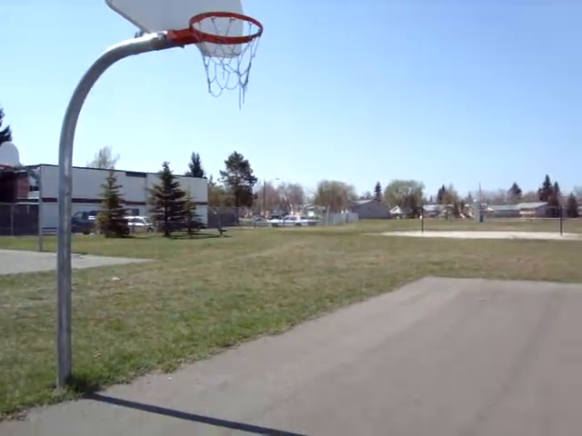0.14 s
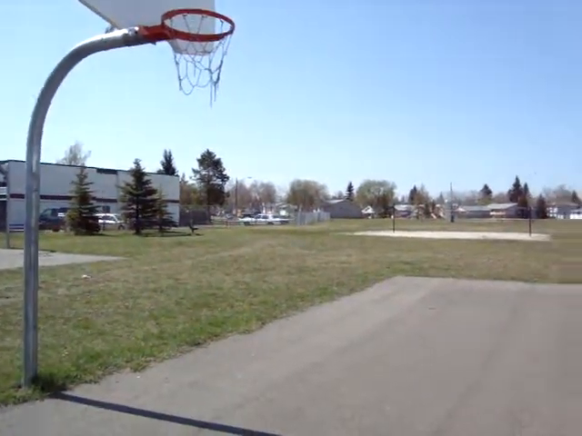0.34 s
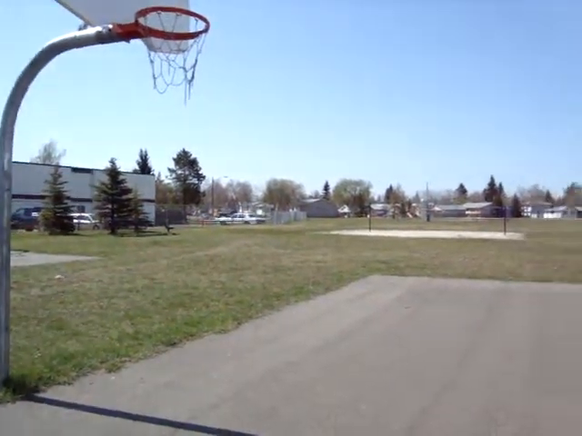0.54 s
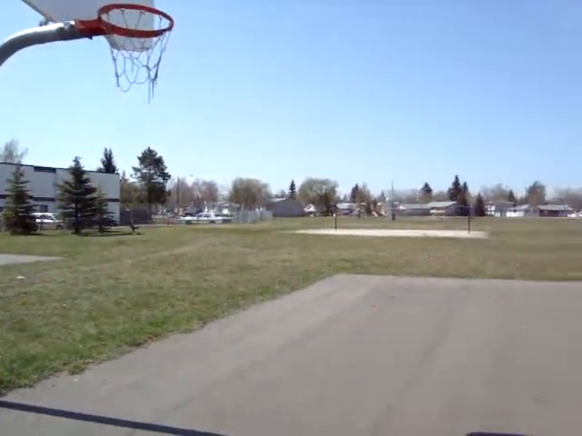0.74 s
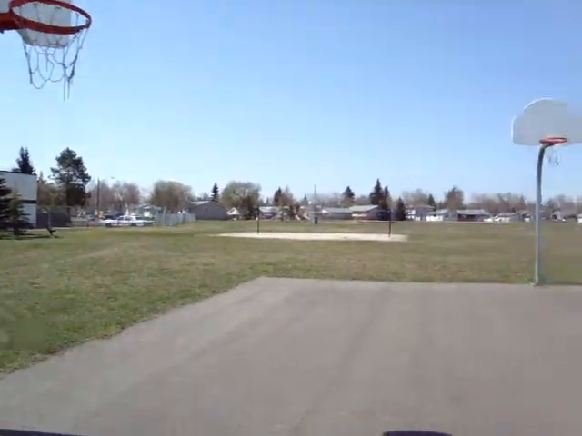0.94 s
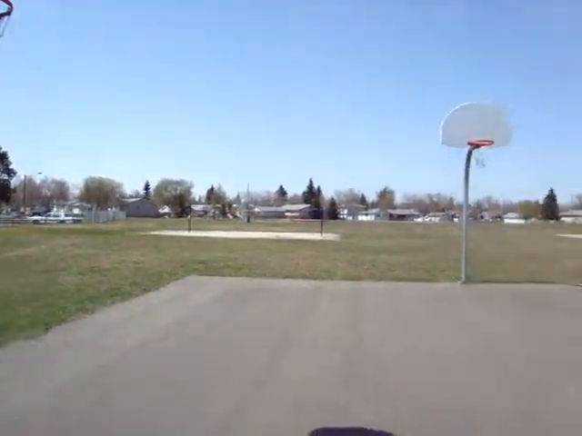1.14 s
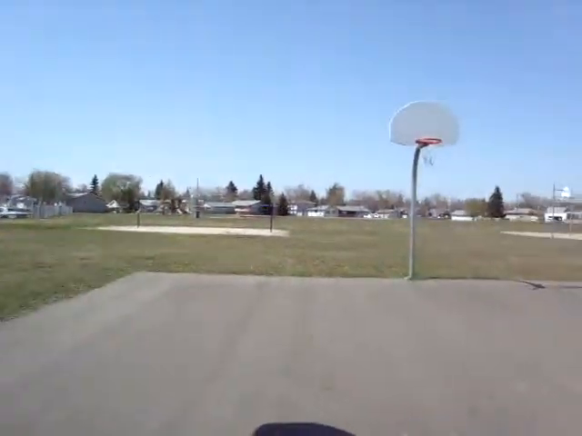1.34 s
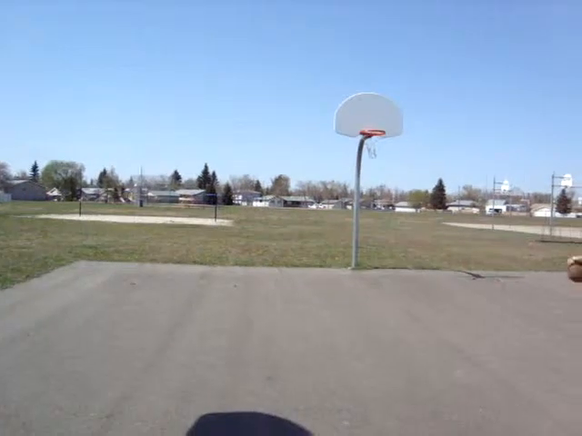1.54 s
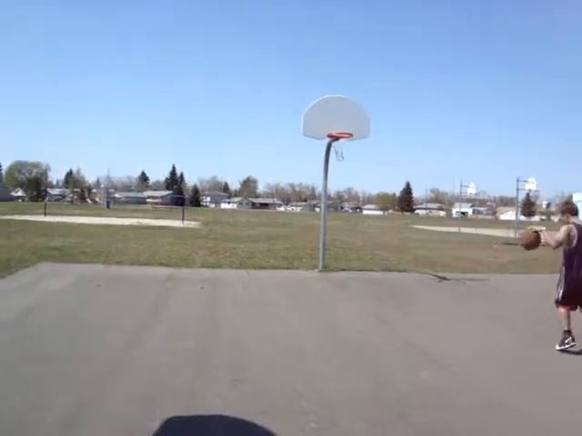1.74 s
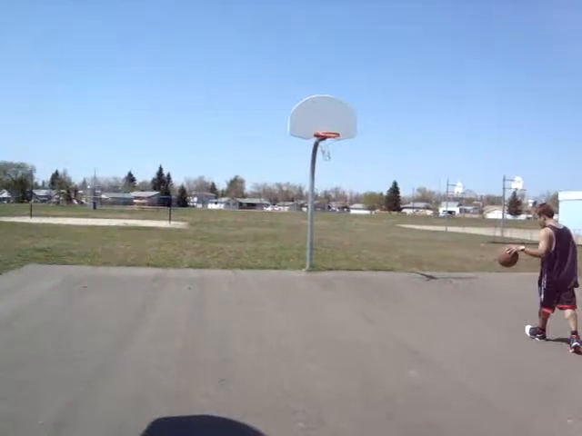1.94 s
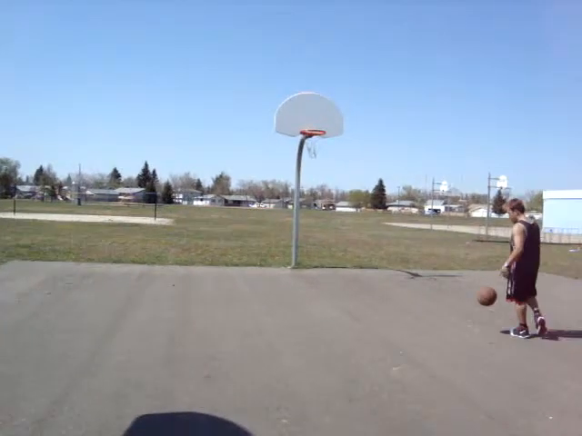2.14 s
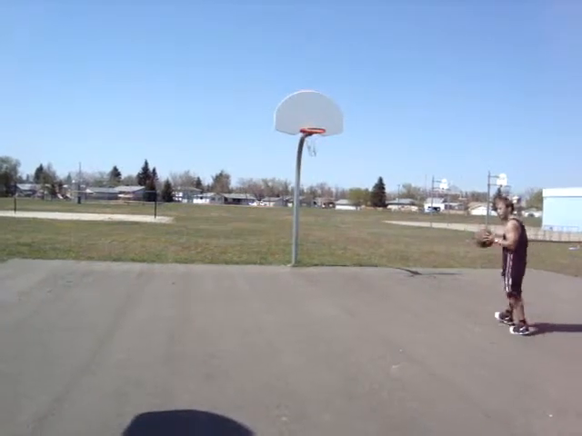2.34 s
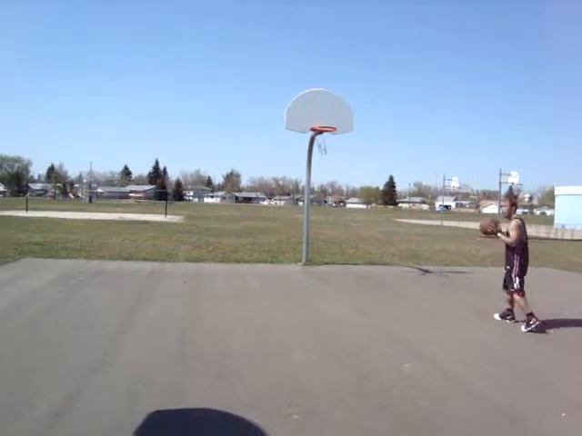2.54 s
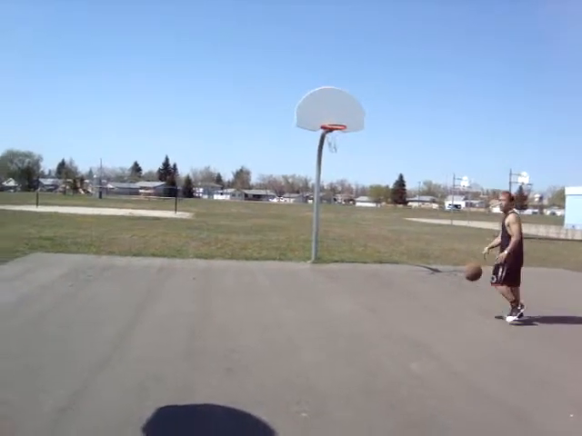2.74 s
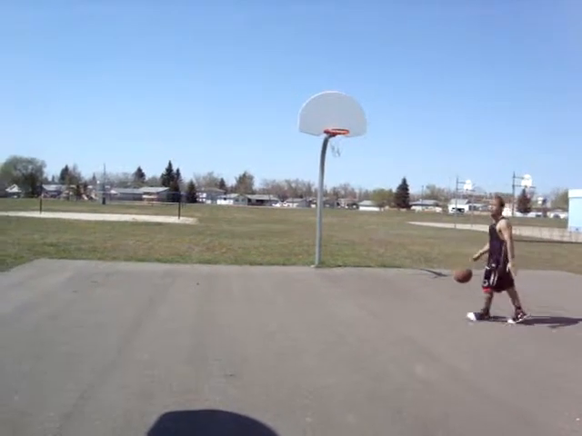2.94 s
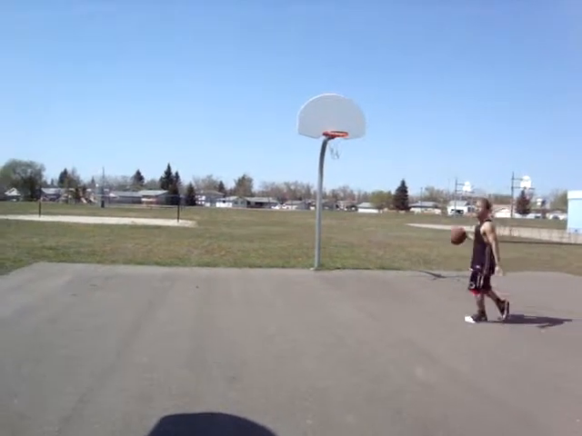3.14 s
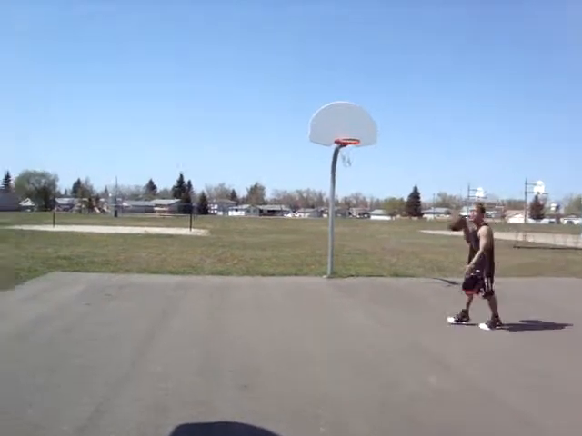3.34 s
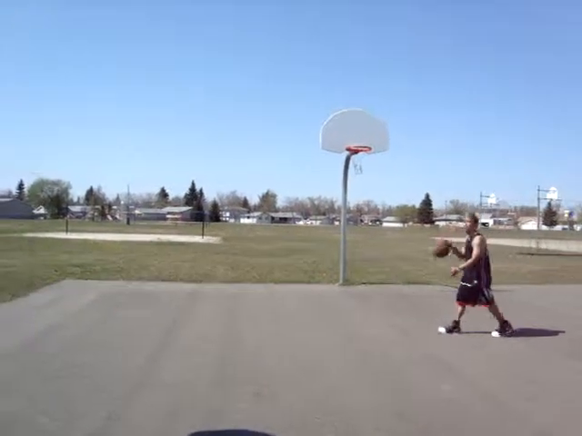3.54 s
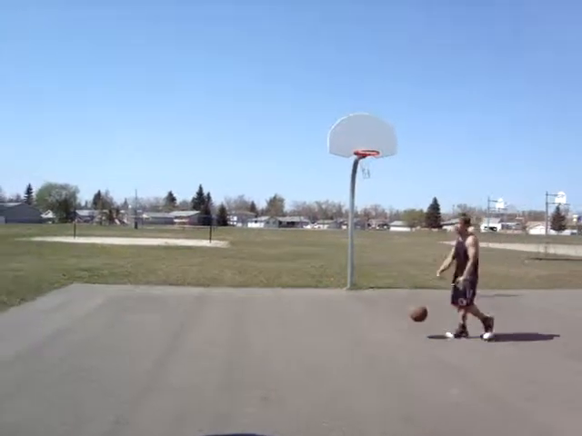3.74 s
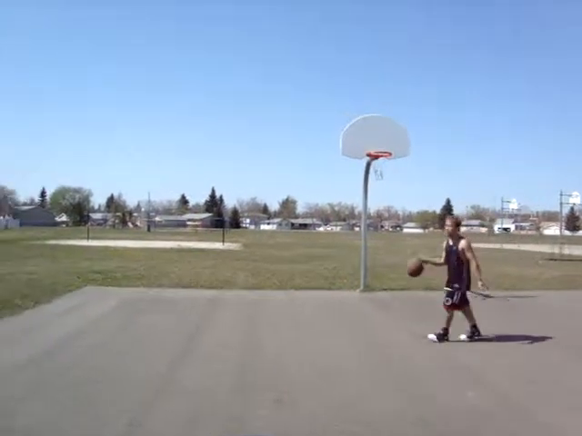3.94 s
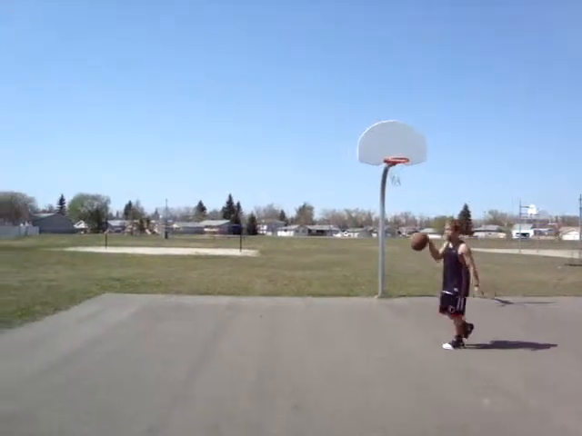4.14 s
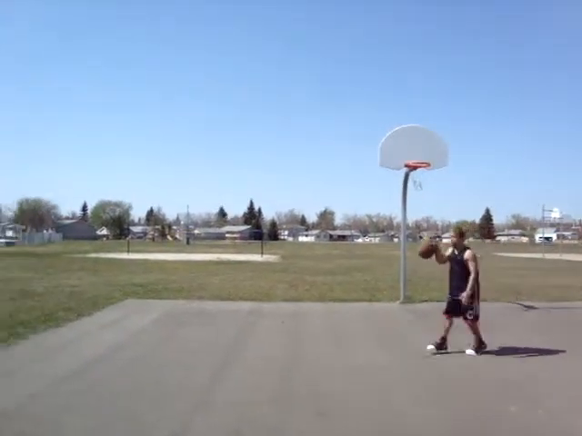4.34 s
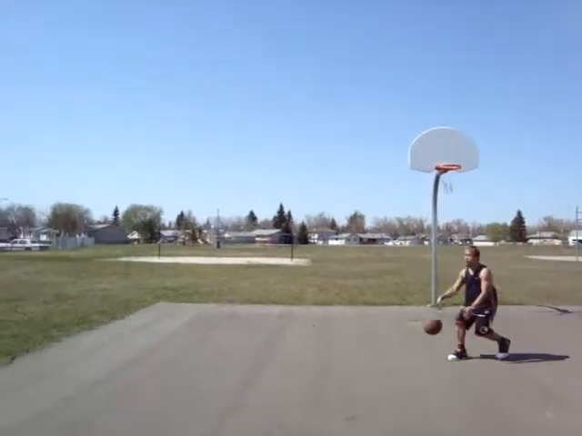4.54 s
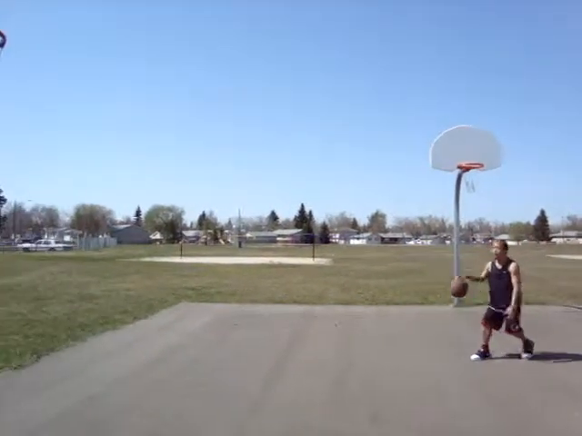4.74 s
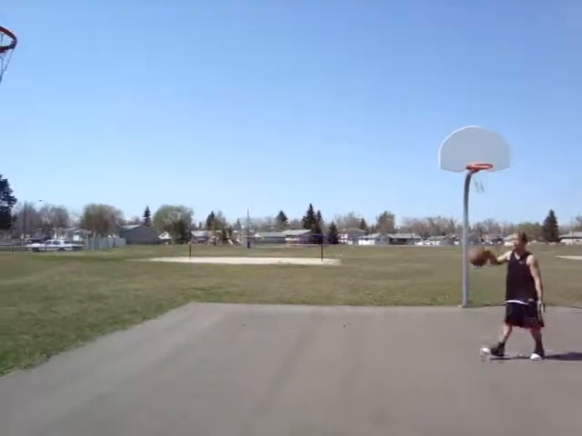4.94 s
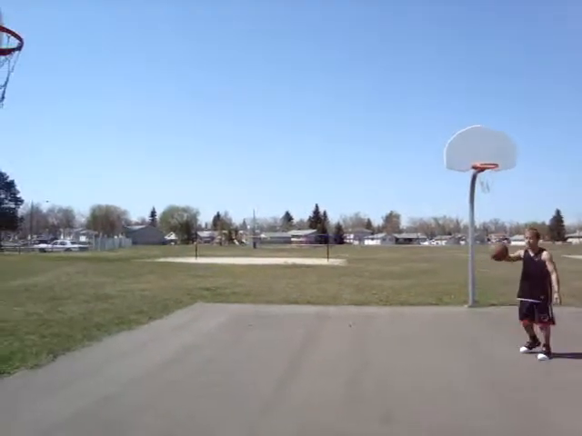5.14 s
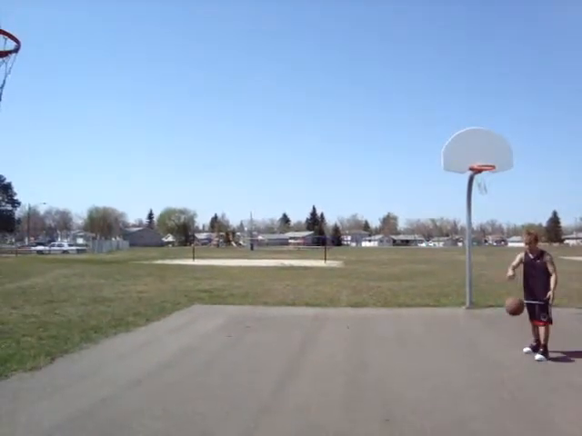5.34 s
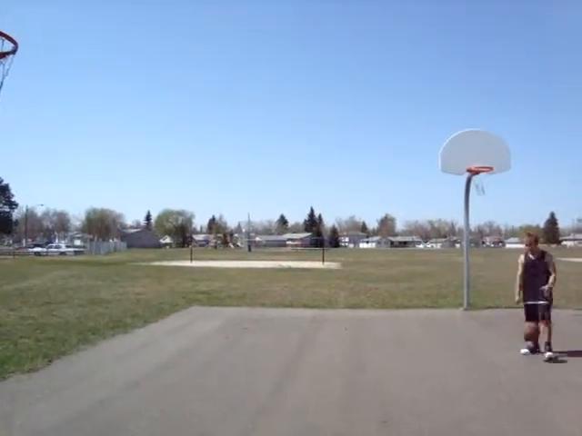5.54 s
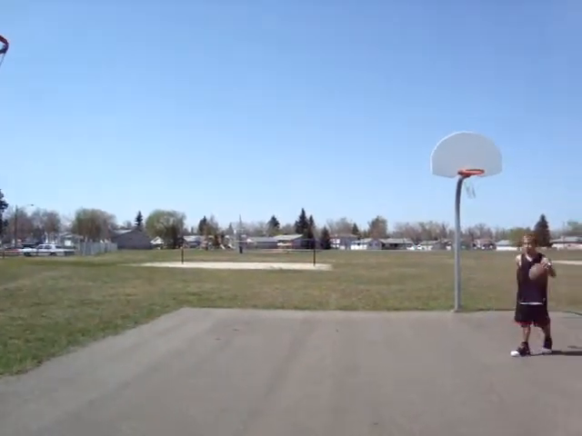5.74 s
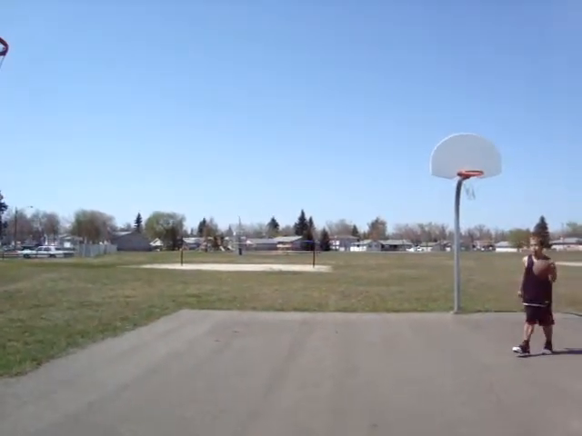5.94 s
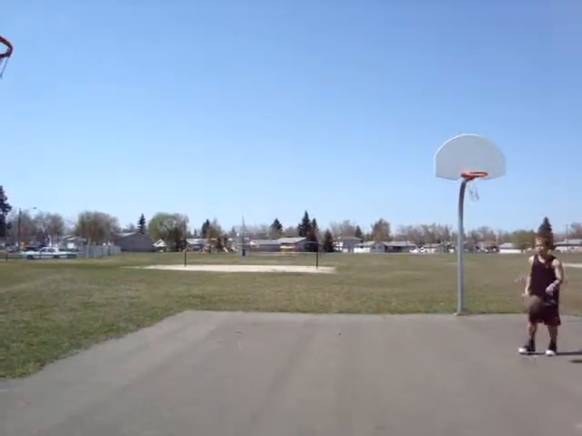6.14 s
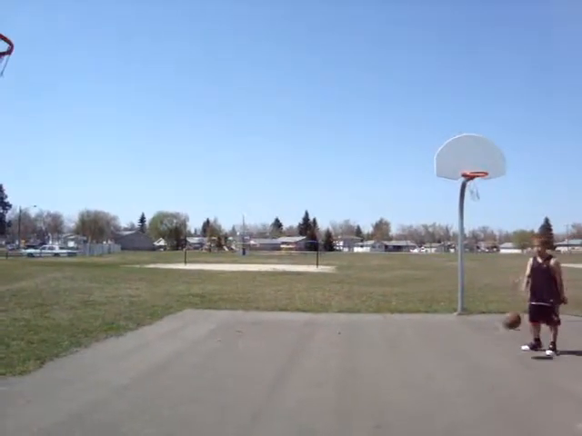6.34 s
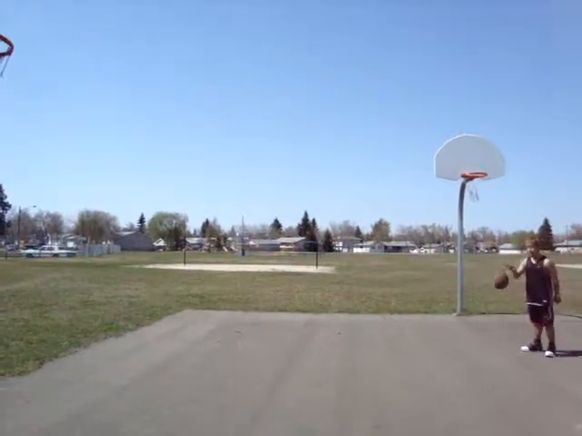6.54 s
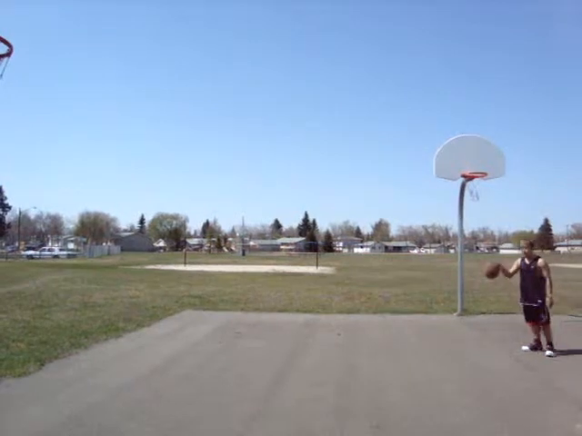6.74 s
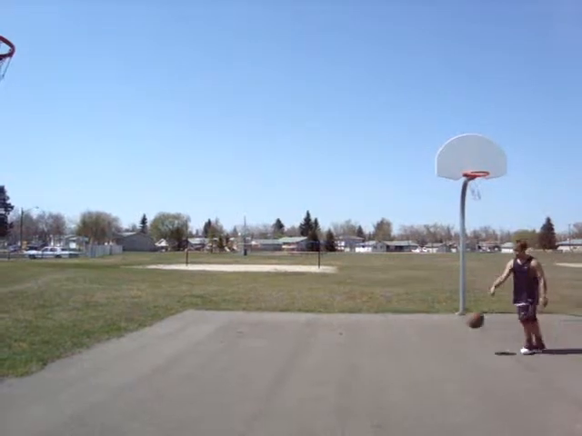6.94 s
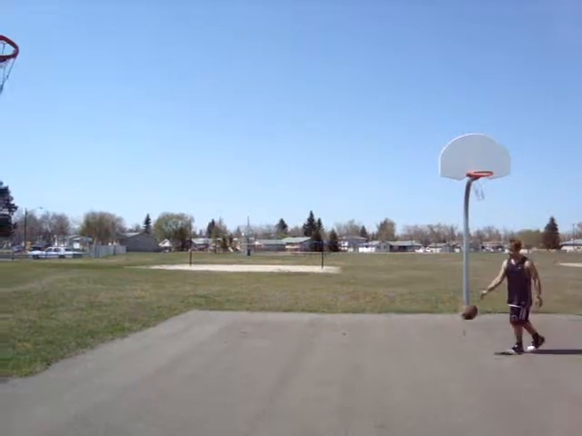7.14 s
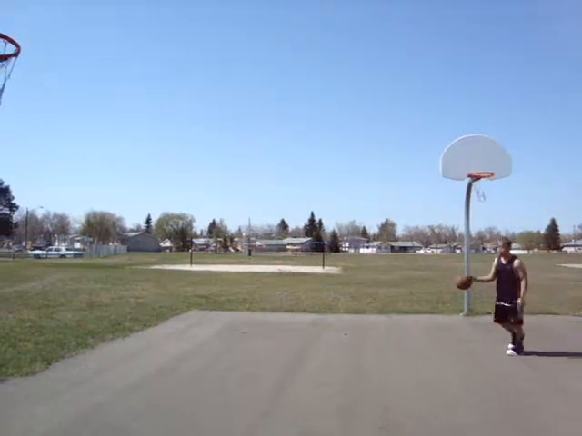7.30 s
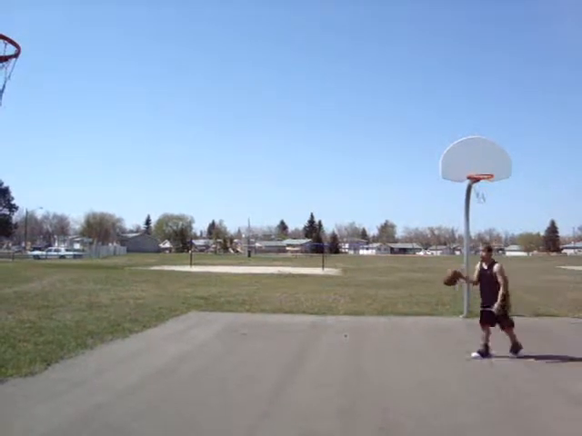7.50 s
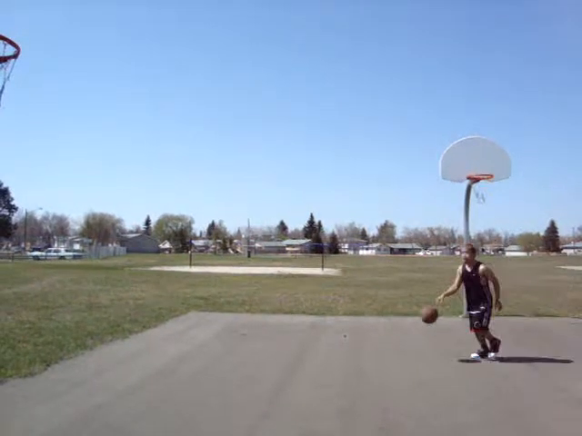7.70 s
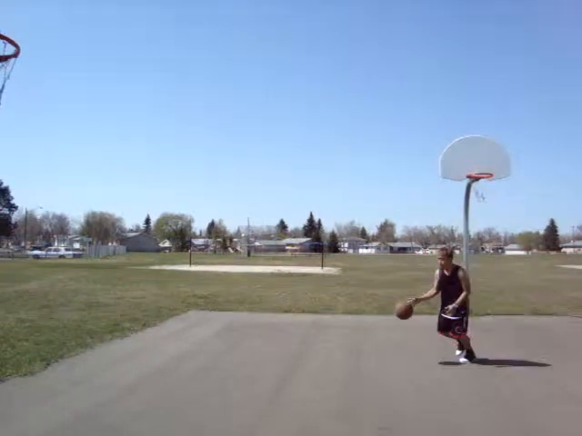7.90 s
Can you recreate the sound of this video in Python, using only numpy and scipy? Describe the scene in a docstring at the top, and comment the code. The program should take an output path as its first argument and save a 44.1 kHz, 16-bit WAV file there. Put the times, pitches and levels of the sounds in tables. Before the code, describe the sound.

On an open asphalt court, a basketball bounces in single, evenly spaced thumps, each with a slight hollow ring and a short echo. Gritty footsteps and soft pats on the ball fall between them. Wind rumbles on the microphone, strongest in the first part. Midway come one firm catch, a small shoe squeak and a few faint bird chirps, then the dribbling continues, slightly softer. Distant traffic hums quietly throughout.

```python
"""A basketball is dribbled at walking pace on an outdoor asphalt court. From the start, wind eddies puff
on the microphone and far traffic hums. A sole scuffs over grit; then the ball slaps down, its shell rings,
it thumps on lift-off, its body hums and the air inside pings. The court scatters the sound, a wall
answers, and a hand pats the ball. Ten more bounces follow, and a gust peaks near 2 s. After 4 s a distant
bird chirps, the ball is caught hard, a pivoting sole squeaks by stick-slip, and three chirps follow."""
import sys
import numpy as np
from scipy import signal
from scipy.fft import rfft, irfft, next_fast_len
from scipy.io import wavfile
from scipy.ndimage import uniform_filter1d, map_coordinates

SR = 44100
rng = np.random.default_rng(int(sys.argv[2]) if len(sys.argv) > 2 else 0)


def store_wav(level_fs):
    """Save 16-bit WAV to argv[1]."""
    pcm = np.round(np.clip(np.atleast_2d(level_fs), -1, 1) * 32767)
    wavfile.write(sys.argv[1], SR, pcm.T.astype(np.int16))


N = 355887
T = np.arange(SR) / SR  # t/s since a contact


def amp(db):
    """Amplitude ratio of a level in decibels."""
    return 10 ** (np.asarray(db) / 20)


def unit(x):
    """Normalisation to rms 1."""
    return x / np.sqrt(np.mean(x ** 2) + 1e-20)


def fade(t60):
    """Exponential decay: 60 dB are lost in t60 seconds."""
    return np.exp(-np.log(1000) * T / t60)


def stroke(rise, t60):
    """Transient envelope of peak 1: a Gaussian onset times an exponential decay."""
    envelope = (1 - np.exp(-(T / rise) ** 2)) * fade(t60)
    return envelope / (envelope.max() + 1e-20)


def wobble(rate):
    """Random modulation: a spline through rate Gaussian values a second."""
    knots = rng.standard_normal(int(N * rate / SR) + 4)
    return map_coordinates(knots, [np.arange(N) * rate / SR])


def pulse(spectrum, size=4096):
    """Minimum phase: the sharpest causal pulse with this (f/Hz, level/dB) spectrum, peak 1."""
    hz, db = np.transpose(spectrum)
    gain = amp(np.interp(np.log(np.fft.rfftfreq(size, 1 / SR) + 1), np.log(hz + 1), db))
    cepstrum = irfft(np.log(gain))
    cepstrum[1:size // 2] *= 2
    cepstrum[size // 2 + 1:] = 0
    response = irfft(np.exp(rfft(cepstrum)))
    return response / np.abs(response).max()


def colour(x, spectrum):
    """Convolution with a unit-energy filter, which keeps the power of white noise."""
    response = pulse(spectrum)
    return signal.fftconvolve(x, response / np.linalg.norm(response))[:len(x)]


def noise(spectrum, size):
    """Filtered Gaussian noise of rms 1."""
    return unit(colour(rng.standard_normal(size), spectrum))


def emphasis(hz, centre_hz, depth_db):
    """Bell curve in log frequency: 0 dB at the centre, depth_db lower far from it."""
    return depth_db * (np.exp(-(2 * np.log2(hz / centre_hz)) ** 2) - 1)


def tilted(spectrum, db_per_octave):
    """Spectral tilt about 2 kHz."""
    return [(hz, db + db_per_octave * np.log2(hz / 2000)) for hz, db in spectrum]


def add(track, start_s, x):
    """Superposition: x joins the track at start_s."""
    i = max(round(start_s * SR), 0)
    track[i:i + len(x)] += x[:max(len(track) - i, 0)]


# spectrum of the wind's rumble: f/Hz, level/dB
RUMBLE_SPECTRUM = [(20, -29.5), (50, -13), (90, -1.5), (170, 3.5), (300, -1.5), (500, -9.5), (1000, -35),
                   (10000, -73)]
# spectrum of one eddy's pressure pulse: f/Hz, level/dB
EDDY_SPECTRUM = [(25, -57), (70, -18.5), (130, 0.5), (250, 5), (450, -4.5), (750, -24.5), (2000, -59),
                 (10000, -80)]
# the strongest eddies: t/s, level/dB
STRONG_EDDIES = [(1.64, -37), (1.72, -37.5), (1.935, -29.5), (1.966, -28), (1.993, -25.5), (2.061, -32),
                 (2.277, -33.5), (2.378, -26), (2.411, -24), (3.117, -32), (3.154, -31.5), (3.549, -38)]


def wind(breeze_db=-60, gust_db=9.5, gust_s=2.04, rise_s=.33, fall_s=.65, peak_eddies_per_s=18):
    """Turbulent pressure at the microphone: a rumble with one gust; eddies pop more often in the gust."""
    t = np.arange(N) / SR - gust_s
    strength_db = breeze_db + gust_db * np.exp(-np.abs(t) / np.where(t < 0, rise_s, fall_s))
    out = amp(strength_db + 1.2 * wobble(4) + wobble(25)) * noise(RUMBLE_SPECTRUM, N)
    eddies_per_s = peak_eddies_per_s * amp(strength_db - strength_db.max()) ** 1.5
    onsets = np.flatnonzero(rng.random(N) < eddies_per_s / SR)
    small_eddies = [(i / SR, strength_db[i] + 13) for i in onsets]
    for s, db in list(STRONG_EDDIES) + small_eddies:
        add(out, s, amp(db) * pulse(EDDY_SPECTRUM))
        flutter = noise(RUMBLE_SPECTRUM, SR) * stroke(rise=.0076, t60=.14)
        add(out, s - .012, amp(db - 17) * flutter)
    return out


# spectrum of far tyre noise: f/Hz, level/dB
TRAFFIC_SPECTRUM = [(120, -36.5), (200, -17.5), (247, -7.5), (268, -8), (366, -9), (578, -7.5), (658, -5),
                    (726, -4), (855, -2.5), (1060, -6), (1220, -5.5), (1720, -12.5), (2130, -14),
                    (3000, -19.5), (9880, -28.5), (12800, -72), (21700, -120)]


def town(lull_s=3.16, lull_db=-49.5, swell_db_per_s=.34):
    """Broadband noise of far tyres eases to a lull and swells again, under a thin high whine."""
    from_lull_s = np.abs(np.arange(N) / SR - lull_s)
    level_db = lull_db + swell_db_per_s * from_lull_s + .4 * wobble(5)
    traffic = amp(level_db) * noise(TRAFFIC_SPECTRUM, N)
    whine_hz = 7572 + 14 * wobble(12)
    return traffic + amp(-73) * np.sin(2 * np.pi * np.cumsum(whine_hz) / SR)


# spectrum of rubber on grit: f/Hz, level/dB
GRIT_SPECTRUM = [(200, -29), (900, 2), (1900, 10.5), (2800, 1.5), (3600, 2.5), (4600, 1.5), (6000, -0.5),
                 (10000, -12.5)]
# soles dragging on asphalt: t/s, level/dB, t60/s, emphasised f/Hz
SCUFFS = [(.012, -37, .025, 2370), (.504, -39, .04, 3000), (0.519, -31, 0.009, 5600),
          (1.0115, -35, .013, 7040), (1.054, -31.5, 0.017, 3800), (1.616, -37.5, 0.056, 1980),
          (1.9362, -27, .009, 3350), (1.969, -38.5, .045, 3450), (2.567, -36.5, .11, 4570),
          (2.6023, -27.5, 0.01, 4500), (3.045, -40, 0.12, 1790), (4.055, -43.5, 0.11, 3000),
          (4.088, -38, .022, 2400), (4.618, -38.5, .035, 4240), (5.286, -45, 0.29, 2690),
          (5.43, -51.5, 0.34, 4400), (5.508, -43.5, 0.044, 4800), (5.783, -47.5, .2, 3300),
          (6.445, -40, .06, 2470), (7.611, -35.5, 0.036, 3240), (7.628, -38, 0.023, 2900)]


def shoes(grain_db=3, rise_share=.055):
    """Sliding friction: loose grains modulate a sole's noise; a longer drag starts more softly."""
    out = np.zeros(N)
    for s, db, t60, bright_hz in SCUFFS:
        friction = rng.standard_normal(SR)
        grains = amp(grain_db * unit(uniform_filter1d(rng.standard_normal(SR), size=40)))
        spectrum = [(hz, level + emphasis(hz, bright_hz, depth_db=14)) for hz, level in GRIT_SPECTRUM]
        drag = stroke(rise_share * t60, t60)
        scuff = unit(colour(friction * grains * drag, spectrum))
        # the drag sets the energy, the grains only share it out
        add(out, s, amp(db - 2.5) * np.sqrt(np.mean(drag ** 2)) * scuff)
    return out


def ring(modes, rise, spread_db=.7, detune=.01, pitch=1, t60_scale=1, spin_db=0):
    """Modal superposition: damped sinusoids, whose lobes sweep past the listener if the ball spins."""
    draws = rng.standard_normal((len(modes), 4))
    tone = np.zeros(SR)
    for (hz, db, t60), (strength, mistuning, speed, angle) in zip(modes, draws):
        lobes_db = spin_db * np.sin(2 * np.pi * ((9 + 2 * speed) * T + angle))
        envelope = amp(db + spread_db * strength + lobes_db) * fade(t60 * t60_scale)
        mode_hz = hz * pitch * (1 + detune * mistuning)
        tone += envelope * np.sin(2 * np.pi * mode_hz * T)
    return tone * (1 - np.exp(-T / rise))


# spectrum of rubber striking asphalt: f/Hz, level/dB
SLAP_SPECTRUM = [(30, -21.5), (100, -0.5), (240, 4), (380, 2.5), (560, -19), (1000, 7.5), (2000, 2),
                 (3600, -4), (5000, -12.5), (7000, -24.5), (10000, -28.5)]
# modes of the rubber shell: f/Hz, level/dB, t60/s
SHELL_MODES = [(303, -13.5, 0.028), (505.4, -19, 0.064), (895, -5.5, 0.024), (1030, 1.5, 0.024),
               (1377, -1.5, 0.017), (1782, -6.5, 0.013)]
# spectrum of the shell's dense higher modes: f/Hz, level/dB
SHUDDER_SPECTRUM = [(80, -13), (300, 6.5), (620, -3), (1000, 9), (1400, 1), (2200, -8), (3600, -10.5),
                    (5500, -43), (10000, -55)]
# the ball's lingering ring, a low body hum and the high ping of the air inside: f/Hz, level/dB, t60/s
LINGERING_MODES = [(430, 27, .13), (992, 19, .16), (1491, 2, .6), (2172, -2, .85), (2869, -5.5, 1.6),
                   (3510, -11, .7), (4435, -10, 1.1)]
LEAD_S, CONTACT_S = .0024, .0098  # from meeting the grit to the slap; from the slap to lift-off


def bounce(db, tilt, pitch, grit, linger_db):
    """Impact excitation: one bounce rings the shell and leaves the body humming and its air pinging."""
    hit, slap_spectrum = np.zeros(SR), tilted(SLAP_SPECTRUM, tilt)
    # grit is crushed first, then the flattening ball slaps the ground
    crunch = noise(tilted(GRIT_SPECTRUM, 1.4), SR) * stroke(rise=.0029, t60=.011)
    add(hit, 0, amp(db - 42 + 21.5 * grit) * crunch)
    add(hit, LEAD_S, amp(db) * pulse(slap_spectrum))
    add(hit, LEAD_S, amp(db - 12.5) * noise(slap_spectrum, SR) * stroke(rise=.00036, t60=.019))
    landing = ring(SHELL_MODES, rise=.0006, pitch=pitch)
    add(hit, LEAD_S, amp(db - 2.2 - 11 * grit) * landing)  # grit weakens the shell's ring
    # the shell springs back into shape and ticks as it leaves the ground
    lift_off = ring(SHELL_MODES, rise=.0015, t60_scale=.85)
    tick = amp(-22) * noise(GRIT_SPECTRUM, SR) * stroke(rise=.00031, t60=.0093)
    add(hit, LEAD_S + CONTACT_S, amp(db - 5) * (lift_off + tick))
    shudder = noise(SHUDDER_SPECTRUM, SR) * stroke(rise=.0075, t60=.12)
    add(hit, LEAD_S, amp(db - 26.5) * shudder)
    # a brighter slap favours a higher ping
    ping_hz = 2330 * 2 ** (.06 * tilt)
    modes = [(hz, level + emphasis(hz, ping_hz, depth_db=8), t60) for hz, level, t60 in LINGERING_MODES]
    hum_and_ping = ring(modes, rise=.004, spread_db=1, detune=.0003, spin_db=4)
    add(hit, LEAD_S, amp(linger_db) * hum_and_ping)
    return hit


# bounces: t/s, level/dB, tilt/(dB per octave), landing pitch ratio, grit (0-1), lingering level/dB
BOUNCES = [(0.2255, -4, 2, 0.952, 0.07, -48), (0.828, -3, 1.9, 1.04, 0.17, -50),
           (1.4759, -9, 4.7, 0.91, 1, -47.5), (2.1729, -6, 0.7, 0.97, .9, -53),
           (2.9394, -7.5, 2.2, 1.09, 0.57, -54), (3.8563, -7.5, 1.7, 1.07, 0.32, -44.5),
           (4.6938, -9.7, 1.2, 0.897, 0.6, -54), (5.5589, -9, 4.3, 0.932, 0.19, -56),
           (6.3513, -8.2, 0.6, 1.192, 0.01, -53.5), (7.1293, -10, 2.2, 0.97, 0.74, -55),
           (7.8834, -8.5, 0.9, 0.9, 0.47, -54)]
# extra path by way of the wall as the player walks: t/s, length/m
WALL_DETOUR = [(.2, 16.2), (.83, 14.95), (2.94, 14.37), (4.7, 16.5), (6.35, 15.5), (7.13, 15.8),
               (7.9, 17.05)]
# spectrum of the wall's reflection: f/Hz, level/dB
WALL_SPECTRUM = [(40, -9.5), (150, 7.5), (265, 10.5), (370, 7), (480, 5.5), (1000, -0.5), (3500, -1.5),
                 (6000, 2.5), (10000, -1.5)]
# spectrum of diffuse reflections around the court: f/Hz, level/dB
SCATTER_SPECTRUM = [(60, -16), (300, 6), (900, 4.5), (2500, 9.5), (6000, -13.5), (10000, -15)]


def dribble(sound_m_per_s=343):
    """Reflection: each bounce returns from a wall, delayed by its extra path over the speed of sound."""
    direct, echo = np.zeros(N), np.zeros(N)
    for s, db, tilt, pitch, grit, linger_db in BOUNCES:
        hit = bounce(db, tilt, pitch, np.clip(grit, 0, 1), linger_db)
        add(direct, s - LEAD_S, hit)
        lag_s = np.interp(s, *np.transpose(WALL_DETOUR)) / sound_m_per_s
        echo_gain = amp(-15 - .4 * db)  # the echoes vary less in level than the bounces
        add(echo, s - LEAD_S + lag_s, echo_gain * colour(hit, WALL_SPECTRUM))
    # ledges on the wall smear its answer
    ledges = noise(SCATTER_SPECTRUM, SR) * stroke(rise=.002, t60=.03)
    smear = signal.fftconvolve(echo, ledges / np.linalg.norm(ledges))[:N]
    return direct + echo + amp(-13.5) * smear


def scatter(x):
    """Diffuse reflection: fences and posts return a brief tail, far houses a faint long one."""
    near = noise(SCATTER_SPECTRUM, SR) * stroke(rise=.004, t60=.36)
    far = noise(SCATTER_SPECTRUM, SR) * stroke(rise=.018, t60=1)
    tail = amp(-29) * near / np.linalg.norm(near) + amp(-28) * far / np.linalg.norm(far)
    return signal.fftconvolve(x, tail)[:N]


# soft pats on the ball: t/s, level/dB, t60/s
PATS = [(0.436, -37, 0.098), (4.075, -48.5, 0.18), (5.288, -40, 0.075), (5.78, -43, 0.19)]
# spectrum of the ball muffled by a palm: f/Hz, level/dB
PAT_SPECTRUM = [(100, -22), (330, -7), (430, 2), (600, -14), (900, -12), (1100, 0), (1350, -14),
                (2500, -16), (4000, -23), (10000, -36)]
# a hard catch: t/s, level/dB
CATCHES = [(4.493, -16)]
# spectrum of the catch: f/Hz, level/dB
CATCH_SPECTRUM = [(60, -28), (200, -22), (310, 11), (480, -14), (680, 7.5), (880, 8), (1250, -16),
                  (2300, -8), (4000, -17.5), (10000, -31.5)]


def hands(rise_share=.077):
    """Damped impact: a palm muffles the ball it pats; in a catch the fingers land just after the palm."""
    out = np.zeros(N)
    for s, db, t60 in PATS:
        add(out, s, amp(db) * noise(PAT_SPECTRUM, SR) * stroke(rise_share * t60, t60))
    for s, db in CATCHES:
        add(out, s, amp(db) * pulse(CATCH_SPECTRUM))
        fingers = noise(CATCH_SPECTRUM, SR) * stroke(rise=.0013, t60=.021)
        add(out, s, amp(db - 1) * fingers)
    return out


# distant chirps: t/s, start f/Hz, end f/Hz, level/dB
CHIRPS = [(4.135, 3750, 3200, -58), (4.875, 3200, 3650, -56), (4.935, 3550, 3950, -61),
          (4.975, 3800, 3400, -54.5)]


def birds(length_s=.054):
    """Frequency modulation: each chirp from the trees is a short, wavering glide of one tone."""
    out, progress = np.zeros(N), np.clip(T / length_s, 0, 1)
    for s, start_hz, end_hz, db in CHIRPS:
        glide_hz = start_hz + (end_hz - start_hz) * progress
        hz = glide_hz * (1 + .042 * wobble(245)[:SR])
        add(out, s, amp(db) * np.sin(np.pi * progress) * np.sin(2 * np.pi * np.cumsum(hz) / SR))
    return out


def squeak(start_s=4.525, climb_s=.088, hold_s=.081, fade_s=.012):
    """Stick-slip oscillation: a pivoting sole stutters while its pitch climbs, then locks and sags."""
    start_hz, top_hz, sag_hz_per_s = 1450, 2110, 1100
    t = np.arange(N) / SR - start_s
    climb = np.clip(t / climb_s, 0, 1)
    held_s = np.clip(t - climb_s, 0, hold_s)
    hz = start_hz + (top_hz - start_hz) * climb - sag_hz_per_s * held_s
    ragged = np.clip(1 - held_s / fade_s, 0, 1)  # 1 in the climb, 0 once the note locks
    sliding = np.clip(np.minimum(t, climb_s + hold_s - t) / fade_s, 0, 1)
    jitter = (.008 + .05 * ragged) * wobble(350)
    phase = 2 * np.pi * np.cumsum(hz * (1 + jitter)) / SR
    stutter_db = (1 + 4 * ragged) * wobble(90)
    tone = np.sin(phase) + amp(-15) * ragged * np.sin(1.5 * phase) + amp(-17) * np.sin(2 * phase)
    return sliding * amp(-42.5 - 4.5 * ragged + stutter_db) * tone


def scene():
    """Superposition in one channel: the player and the court's scatter, over wind, birds and town."""
    player = dribble() + hands() + shoes() + squeak()
    return (player + scatter(player) + wind() + birds() + town())[None]


def record(dry):
    """Band limiting: an ideal low-pass filter removes everything above the cutoff."""
    cutoff_hz, size = 10050, next_fast_len(N + SR)
    passband = np.fft.rfftfreq(size, 1 / SR) < cutoff_hz
    return irfft(rfft(dry, size) * passband, size)[:, :N]


dry = scene()
out = record(dry)
store_wav(out)
```